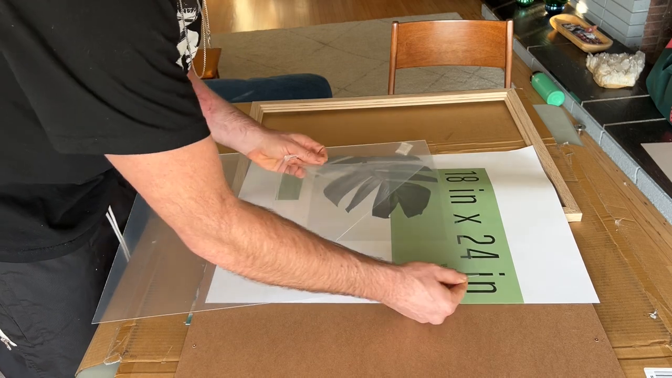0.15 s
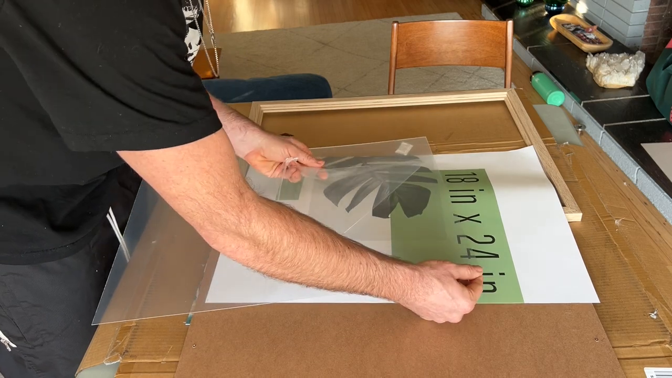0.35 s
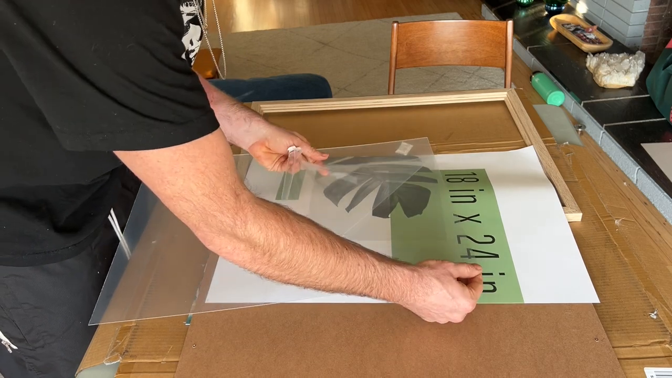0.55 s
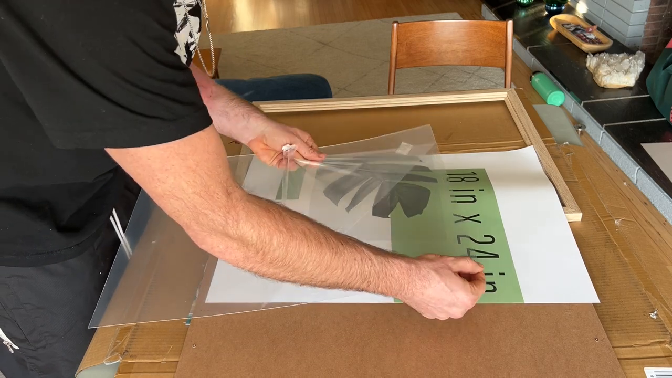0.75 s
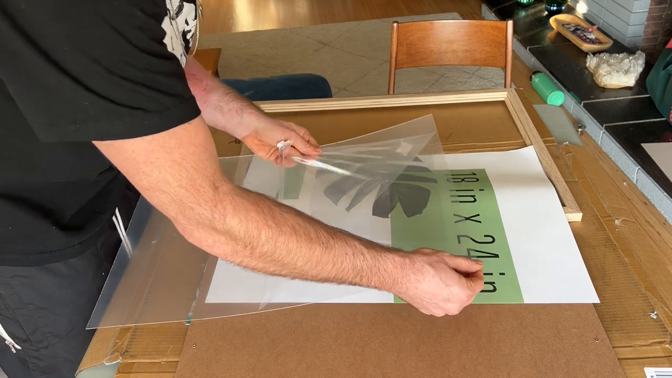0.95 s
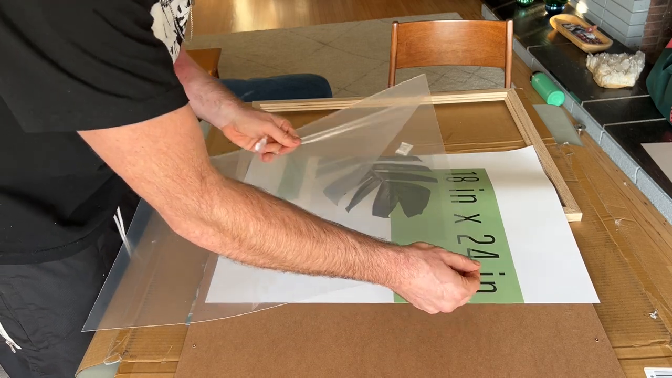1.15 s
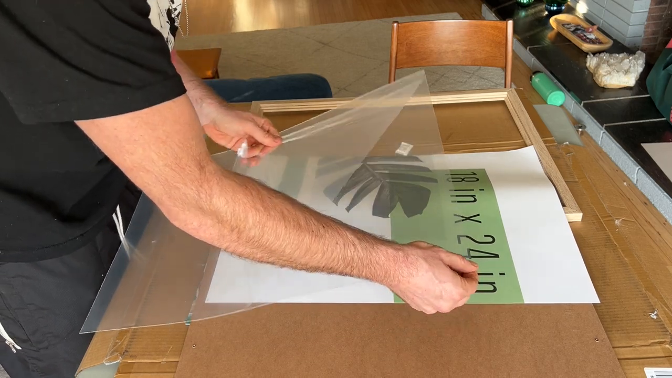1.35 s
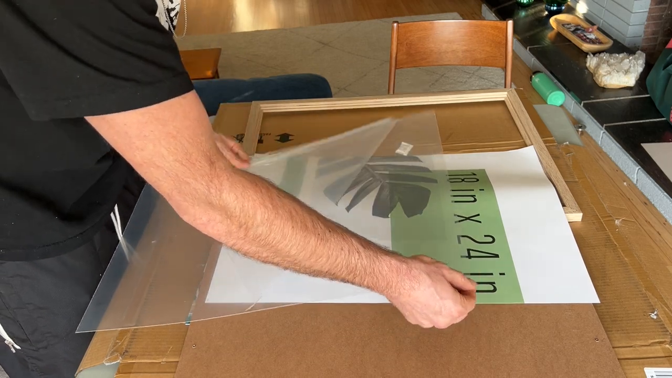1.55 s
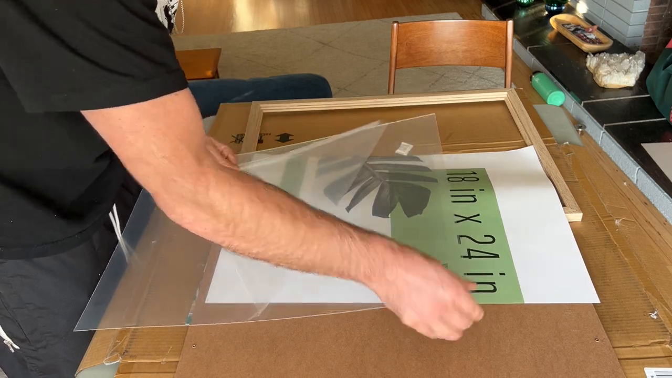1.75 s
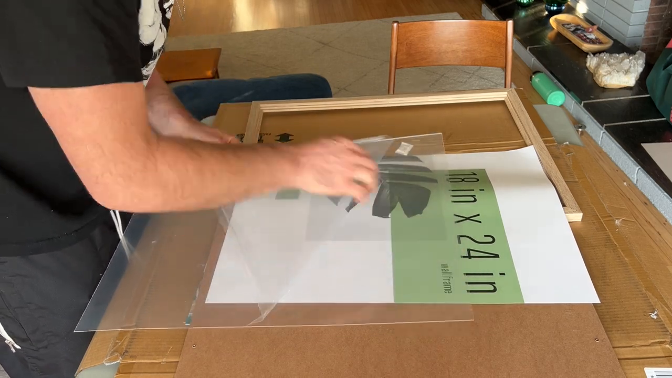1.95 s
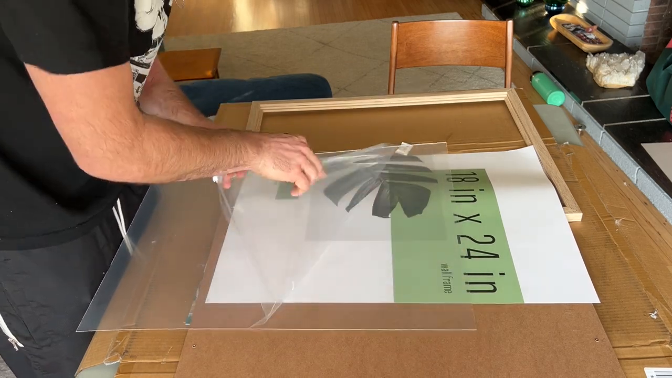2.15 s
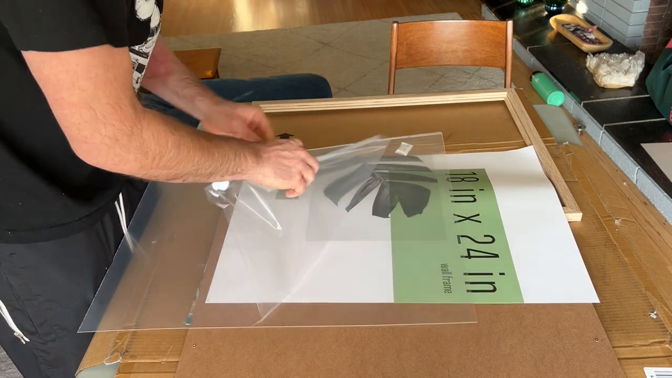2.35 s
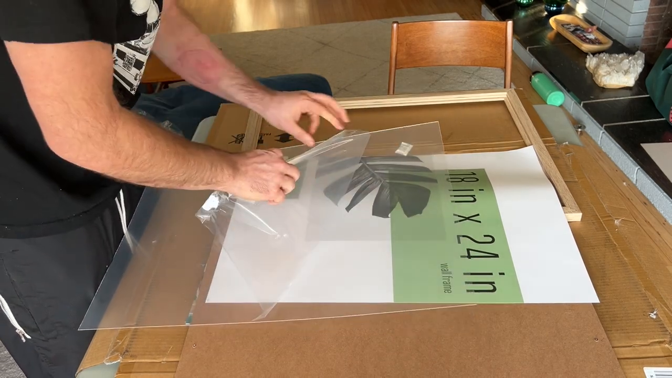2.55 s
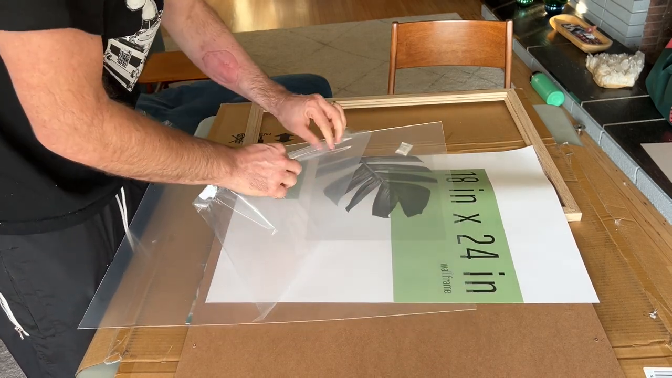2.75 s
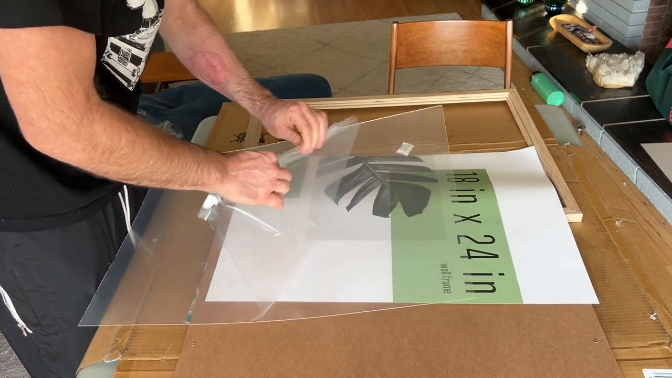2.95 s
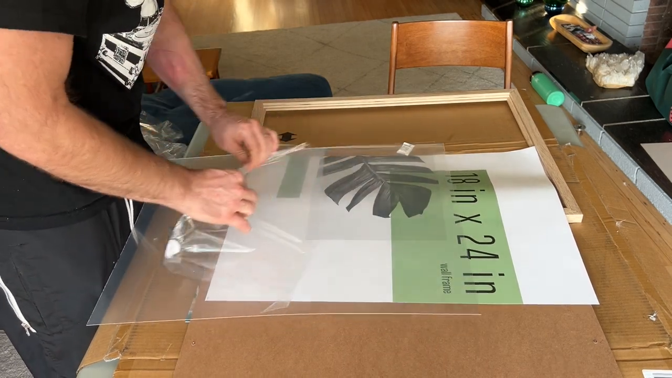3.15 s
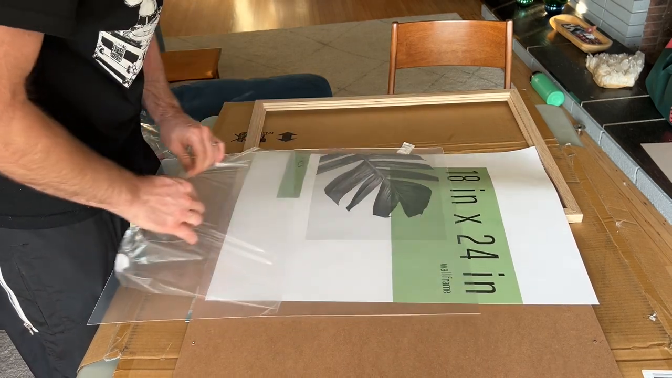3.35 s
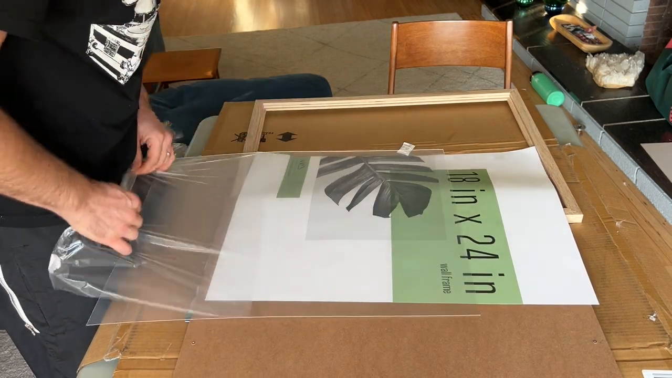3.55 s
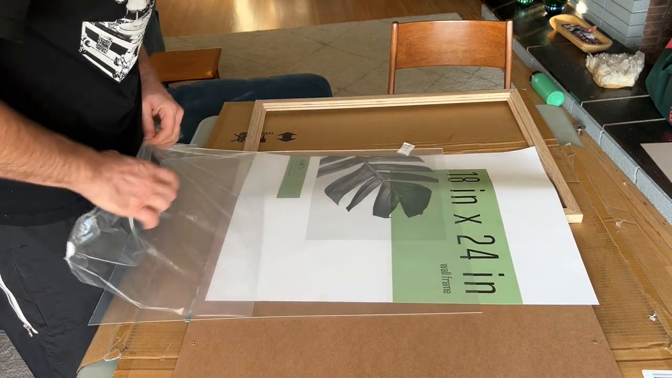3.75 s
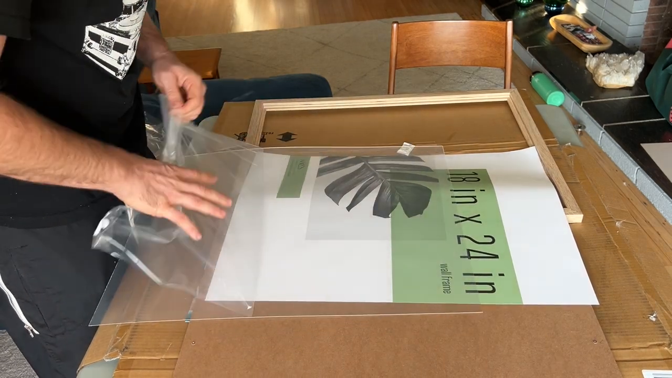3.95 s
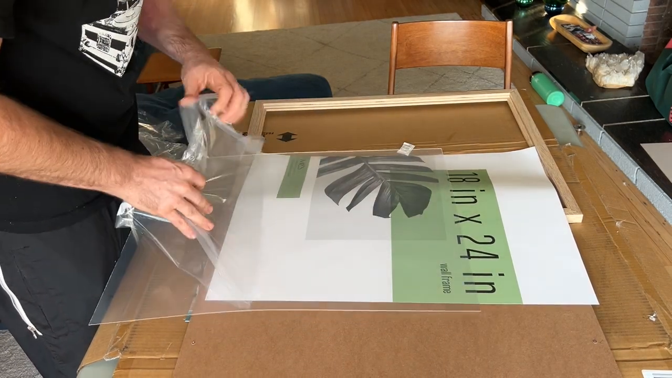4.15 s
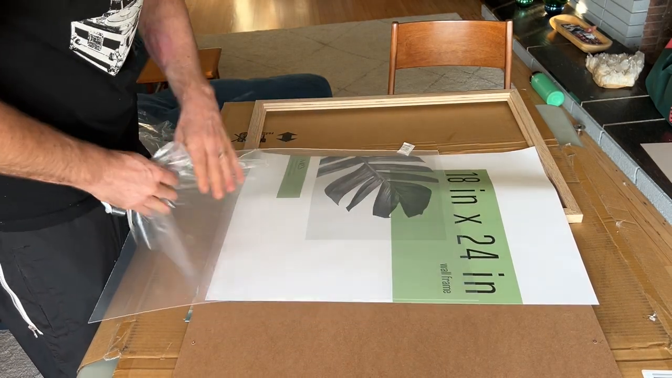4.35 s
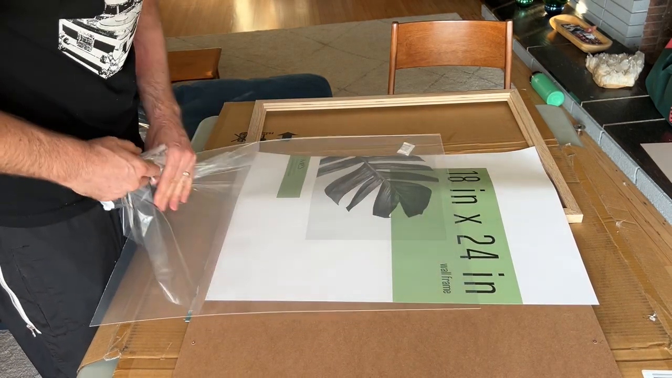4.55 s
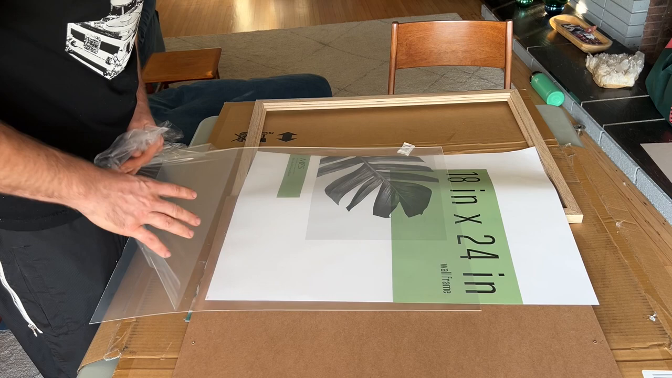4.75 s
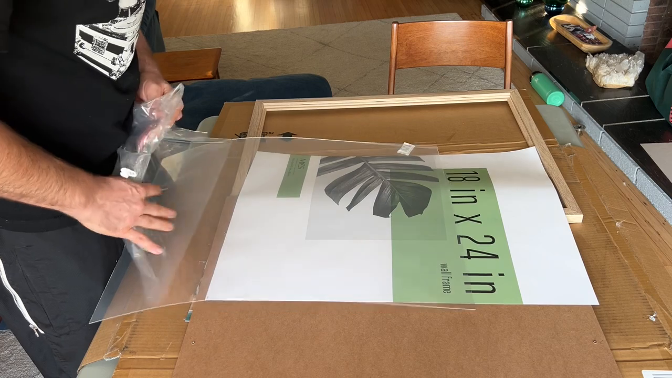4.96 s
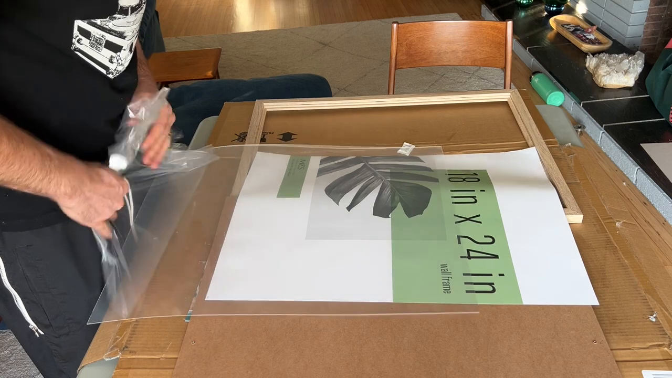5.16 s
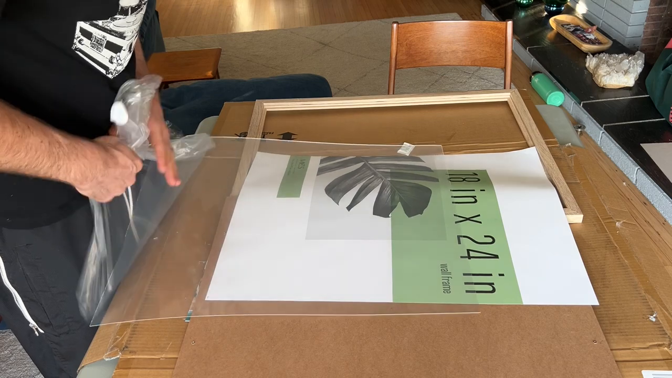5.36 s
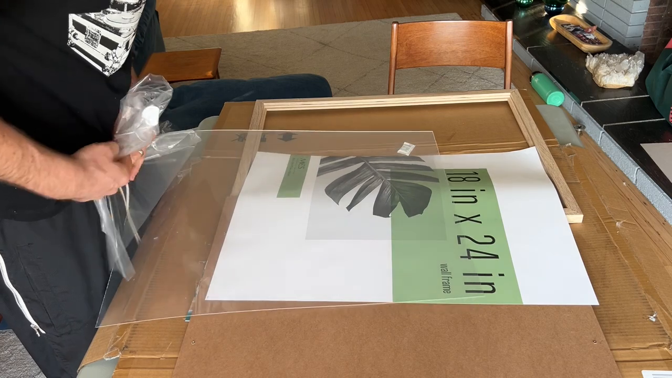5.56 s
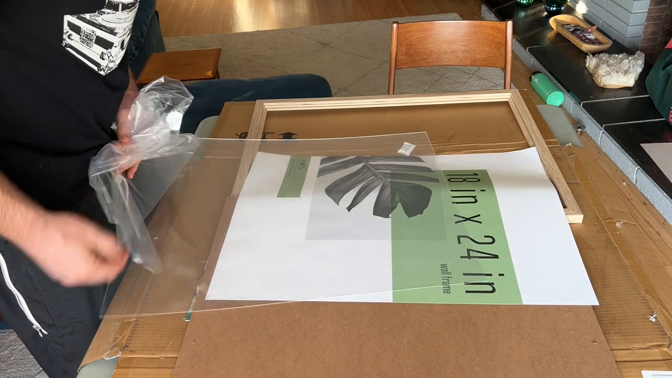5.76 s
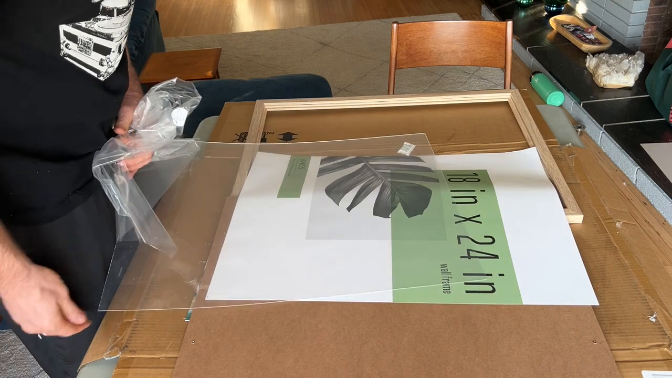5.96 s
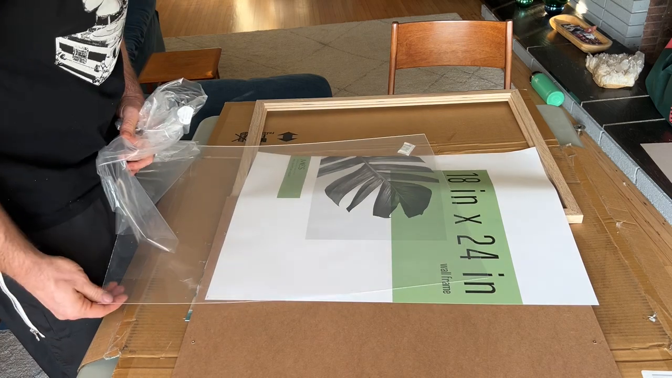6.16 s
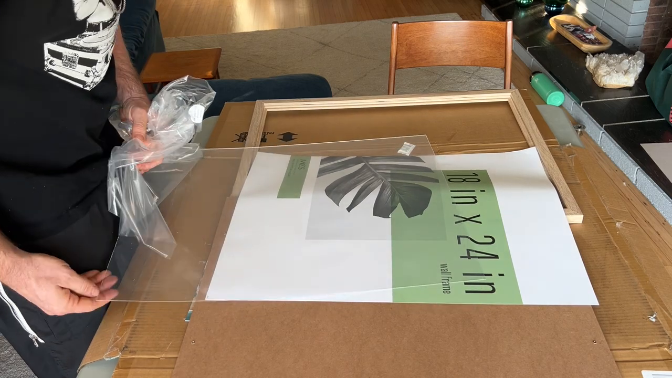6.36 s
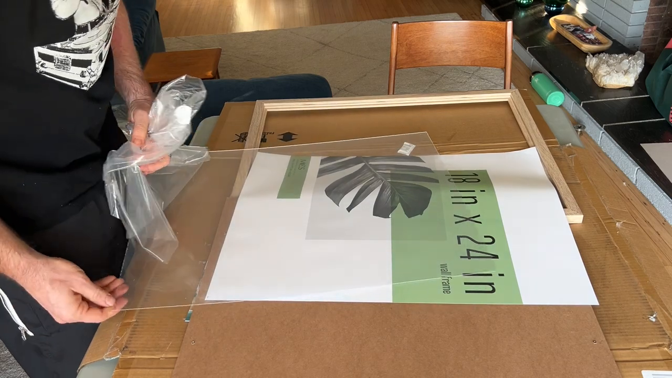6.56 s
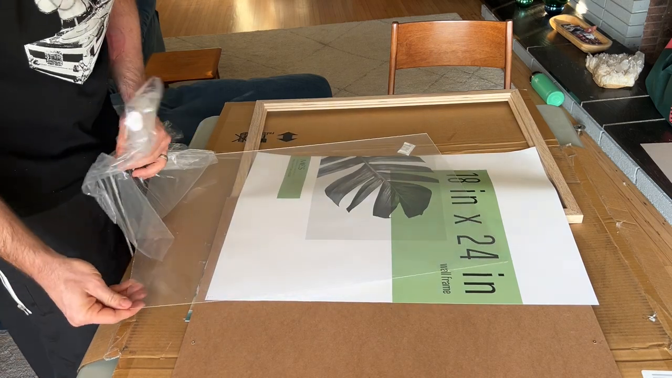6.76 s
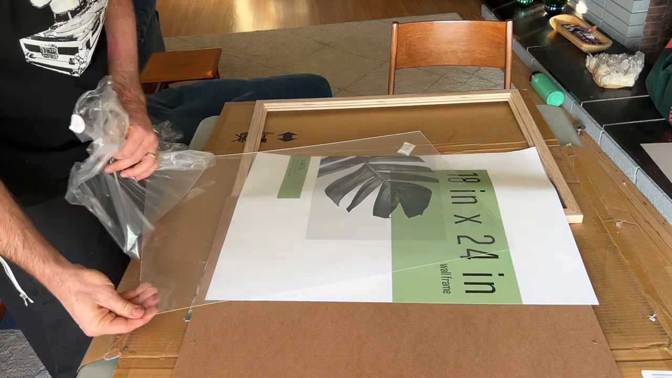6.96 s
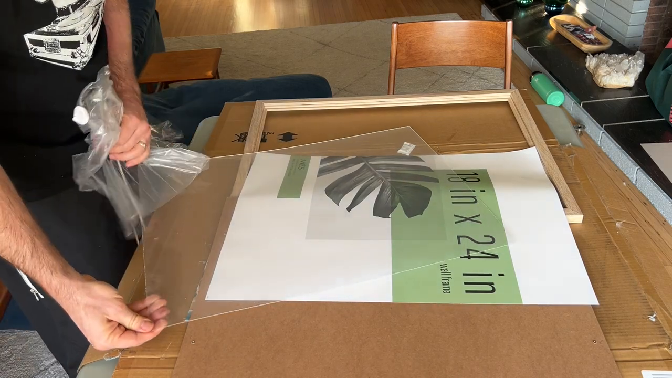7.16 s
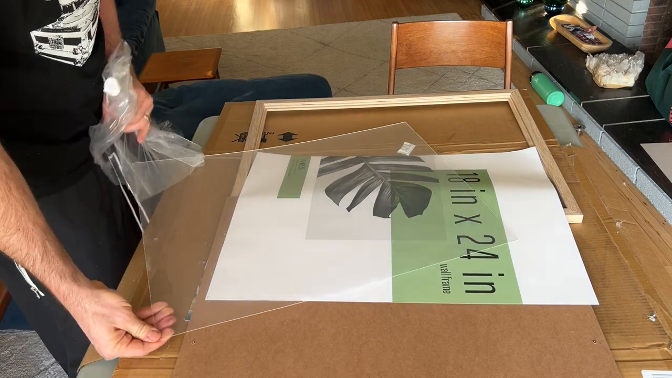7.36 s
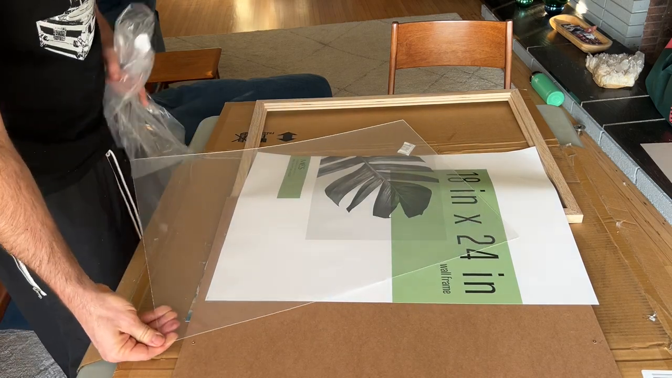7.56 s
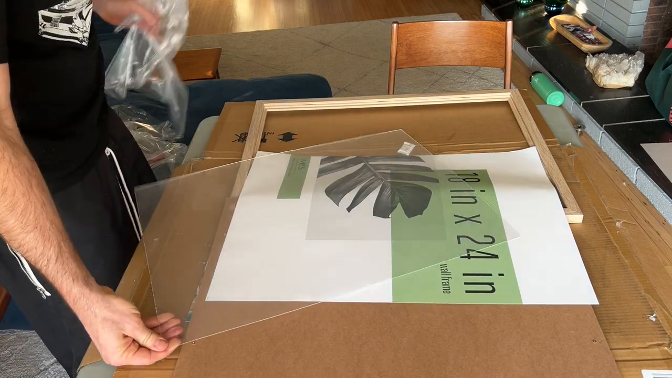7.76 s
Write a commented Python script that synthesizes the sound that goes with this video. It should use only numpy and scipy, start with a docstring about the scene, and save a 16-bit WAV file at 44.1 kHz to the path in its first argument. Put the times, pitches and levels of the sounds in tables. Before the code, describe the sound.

Hands strip clinging film from a plastic sheet: short bright rips, a longer steady hiss, crackly crumpling, low sheet wobbles, then a fainter peel.

```python
"""Peeling protective film off a plastic sheet

Hands peel a thin film off a clear plastic sheet on a work table, indoors. Each pull snaps a swarm of
tiny bonds, made of random clicks: the taut film hisses and the sheet drums under it. Creases crackle,
hand moves rustle the loose film and slide the sheet, and the sheet scrapes, wobbles and bumps the table.
Shaped noise and wavering tones make the room's background, and decaying noise makes its echoes."""
import sys
import numpy as np
from scipy import signal
from scipy.fft import rfft, irfft, next_fast_len
from scipy.io import wavfile
from scipy.ndimage import uniform_filter1d

SR = 44100
rng = np.random.default_rng(int(sys.argv[2]) if len(sys.argv) > 2 else 0)


def pcm_store(signal):
    """Save signal as 16-bit PCM."""
    levels = np.round(np.clip(np.atleast_2d(signal), -1, 1) * 32767)
    wavfile.write(sys.argv[1], SR, levels.astype(np.int16).T)


N = 343627
T = np.arange(N) / SR
RELEASE_S = .05  # extra time in which a stopped peel runs out

# Tone colour of the drumming sheet. Each row: frequency in Hz, strength in dB per Hz (relative).
SHEET_SPECTRUM = [(30, -28.5), (80, -10.5), (150, -0.5), (260, -3.5), (420, 3), (700, -4.5), (1300, -4),
                  (2500, -3.5), (8000, -18.5)]
# Tone colour of the loose film. Each row: frequency in Hz, strength in dB per Hz (relative).
LOOSE_SPECTRUM = [(300, -19.5), (1500, -2.5), (3000, -2), (6000, -3), (10000, -3), (16000, -7)]


def amp(db):
    """Turns decibels into gain."""
    return 10 ** (np.asarray(db) / 20)


def evened(x):
    """Scales a sound to an average strength (rms) of 1."""
    return x / np.sqrt(np.mean(x ** 2) + 1e-20)


def read(points, hz):
    """Reads a table between its rows, on a log-frequency axis."""
    f, value = np.transpose(points)
    return np.interp(np.log(hz + 1), np.log(f + 1), value)


def add(mix, s, sound):
    """Mixes a sound in, starting at s seconds."""
    part = mix[..., max(round(s * SR), 0):][..., :sound.shape[-1]]
    part += sound[..., :part.shape[-1]]


def coloured(x, spectrum):
    """Filters x by a spectrum and scales it to rms 1."""
    size = next_fast_len(x.shape[-1] + 512)
    gain = amp(read(spectrum, np.fft.rfftfreq(size, 1 / SR)))
    return evened(irfft(rfft(x, size) * gain, size)[..., :x.shape[-1]])


def snaps(count, per_s, spread_db):
    """Random clicks for mid and side; a positive spread makes a few large, a negative one a few small."""
    size = amp(spread_db * np.minimum(rng.exponential(1, (2, count)), 4.5))
    happens = rng.random((2, count)) < per_s / SR
    return evened(size * rng.standard_normal((2, count)) * happens)


def waver(count, rate_hz):
    """Wanders at random, in straight lines between rate_hz random points per second."""
    knots = rng.standard_normal(8192)
    return np.interp(np.arange(count) / SR * rate_hz, np.arange(len(knots)), knots)


def stroke(count, rise_s, fall_s):
    """Fades in over rise_s and out over fall_s."""
    t = np.arange(count) / SR
    return np.clip(t / rise_s, 0, 1) * np.clip((t[-1] - t) / fall_s, 0, 1)


def ambience(level_db=-51):
    """Background of the room: low, rumbling noise and faint tones whose phase wavers."""
    # Colour of the noise. Each row: frequency in Hz, strength in dB per Hz (relative).
    air_spectrum = [(20, -22), (50, 0), (80, 1.5), (120, -9), (250, -18.5), (480, -23), (900, -27.5),
                    (2500, -27), (8000, -30.5), (16000, -37.5)]
    # Humming tones. Each row: centre frequency in Hz, rms level in dB in the mid.
    hum_tones = [(79.7, -62.5), (157.7, -63.5), (487, -69.5)]
    air = amp(level_db) * coloured(rng.standard_normal((2, N)), air_spectrum)
    for hz, db in hum_tones:
        phase = 2 * np.pi * hz * T + 2.9 * waver(N, rate_hz=7.8)
        air[0] += amp(db) * np.sqrt(2) * np.sin(phase)
    return air


def handling(slide_db=-3.0, rustle_db=-4):
    """With each hand move the sheet scuffs over the table while the loose film crackles unevenly."""
    # Hand moves. Each row: peak time in seconds, rise in seconds, fall in seconds,
    # sliding sheet in dB and rustling film in dB at the peak (slide_db and rustle_db are added later).
    moves = [ (0.01, 0.078, 0.13, -41, -41.5), (0.21, 0.022, 0.13, -51.5, -50),
             (0.50, 0.036, 0.13, -50.5, -42), (0.72, 0.023, 0.053, -45.5, -52),
             (0.905, .01, 0.061, -50, -55.5), (1.12, 0.11, .05, -44.5, -38.5),
             (1.26, 0.093, 0.12, -35.5, -30), (1.78, 0.11, 0.095, -52, -61),
             (2.18, 0.057, 0.19, -44, -39.5), (2.31, 0.19, 0.24, -50.5, -38.5),
             (2.70, .08, 0.4, -64, -49.5), (3.74, 0.18, 0.11, -46, -43), (3.828, .012, 0.079, -43, -35),
             (4.04, 0.17, 0.14, -38, -29.5), (4.50, 0.3, 0.19, -36, -31.5), (4.90, 0.09, 0.21, -33, -27),
             (5.19, .12, 0.11, -34, -25), (5.40, 0.13, 0.073, -30.5, -28),
             (5.60, 0.092, 0.22, -32.5, -29.5), (5.78, .03, 0.2, -49, -43), (5.985, 0.013, 0.058, -41, -40),
             (6.10, 0.045, 0.19, -50.5, -52), (6.329, 0.028, 0.26, -52.5, -50.5),
             (6.60, .015, 0.18, -52.5, -49.5), (6.79, 0.13, 0.13, -58, -50),
             (7.73, 0.037, 0.054, -36, -33.5), ]
    # Colour of the sliding sheet. Each row: frequency in Hz, strength in dB per Hz (relative).
    slide_spectrum = [(30, -25.5), (100, -2), (250, -3), (430, 3), (750, -2.5), (1400, -4.5), (3000, -18),
                      (8000, -26.5)]
    drop_db = -14  # change in level one rise before and one fall after the peak
    slide, rustle = np.zeros((2, N))
    for s, rise, fall, sheet_db, film_db in moves:
        away = np.maximum((s - T) / rise, (T - s) / fall)
        near = away < 3
        motion_db = drop_db * away[near]
        # overlapping moves add as power
        slide[near] = np.hypot(slide[near], amp(sheet_db + motion_db))
        rustle[near] = np.hypot(rustle[near], amp(film_db + motion_db))
    scuff = coloured(snaps(N, per_s=2500, spread_db=1.0), slide_spectrum)
    scuff = scuff * amp(slide_db + 0.53 * waver(N, rate_hz=47))
    crackle = coloured(snaps(N, per_s=6000, spread_db=2.6), LOOSE_SPECTRUM)
    crackle = crackle * amp(rustle_db + 2 * waver(N, rate_hz=110))
    return slide * scuff + rustle * crackle


def crinkle(s, level_db, tilt_db, travel_s=.0022, ring_s=0.00082):
    """A crease flips; bending waves carry its treble through the film faster than its bass."""
    t, hz = np.arange(1024) / SR, np.fft.rfftfreq(1024, 1 / SR)
    flip = rng.standard_normal(len(t)) * (np.exp(-t / ring_s) + .04 * np.exp(-t / .004))
    colour = amp(read(LOOSE_SPECTRUM, hz) + tilt_db * np.clip((hz - 2000) / 8000, 0, 1))
    lag = np.exp(-4j * np.pi * travel_s * np.sqrt(1000 * hz))  # delays 1000 Hz by travel_s
    snap = irfft(rfft(flip) * colour * lag)
    # the level is set as if all the energy fell within 4 ms
    return s - .0007, amp(level_db) * snap / np.linalg.norm(snap) * np.sqrt(0.004 * SR)


def bell(octaves, width):
    """A smooth hump on a log-frequency axis."""
    return np.exp(-.5 * (octaves / width) ** 2)


def patches(shape):
    """Random patches of rms 1, some 500 Hz by 50 ms."""
    field = rng.standard_normal(shape)
    along_hz = uniform_filter1d(field, size=3, axis=0)
    return evened(uniform_filter1d(along_hz, size=18, axis=1))


def film_gain(hz, ring_hz, bright_db, ring_db=7.0, ring_octaves=0.35, overtone_db=2, overtone=2.03,
              skirt_db=8, skirt_octaves=1.46):
    """The taut film rings with one broad mode and its overtone, and radiates poorly below them."""
    # Basic colour of the film. Each row: frequency in Hz, strength in dB per Hz (relative).
    film_spectrum = [(200, -23), (1000, -16.5), (2000, -8), (3500, -0.5), (6000, -3.5), (8000, -2.5),
                     (10000, 0), (12500, -3), (16000, -5.5)]
    octaves = np.log2((hz + 1) / ring_hz)
    modes = ring_db * bell(octaves, ring_octaves)
    modes = modes + overtone_db * bell(octaves - np.log2(overtone), 0.21)
    skirt = skirt_db * np.clip(-(octaves + 0.29) / (skirt_octaves - .35), 0, 1)
    treble = np.clip((hz - 5500) / 6000, 0, 1) * (bright_db + 6)
    shifting = 1.7 * patches(octaves.shape)  # wrinkles come and go in the span
    gain = amp(read(film_spectrum, hz) + modes - skirt + treble + shifting)
    return gain / np.linalg.norm(gain, axis=0)


def peel(t, stop_s, level_db, ring_hz, sheet_db, bright_db, catch_db=0.65, drum_db=-2):
    """Bonds snap along the peel line and shake both the film and the sheet, until the hand stops."""
    grab_db, grab_s = -6.5, 0.0074  # the hiss starts this much weaker and takes hold this fast
    release_db = -17  # drop over RELEASE_S once the hand stops, before the final fade
    bonds = snaps(len(t), per_s=15000, spread_db=0.6)
    hz, at, z = signal.stft(bonds, SR, nperseg=256)
    z *= film_gain(hz[:, None], np.interp(at, t, ring_hz), np.interp(at, t, bright_db))
    hiss = evened(signal.istft(z, SR, nperseg=256)[1][:, :len(t)])
    hiss = hiss * amp(level_db + grab_db * np.exp(-t / grab_s))
    drum = coloured(bonds, SHEET_SPECTRUM) * amp(sheet_db + drum_db)
    # the peel line catches and runs on, so the level flutters
    flutter_db = catch_db * waver(len(t), rate_hz=180)
    force = amp(release_db * np.maximum(t - stop_s, 0) / RELEASE_S + flutter_db)
    return (hiss + drum) * force * stroke(len(t), rise_s=0.0019, fall_s=0.0076)


def pull(s, length, level_db, swell_db, start_hz, end_hz, sheet_db, bright_db):
    """One short pull: force and tautness change evenly, the hiss dulls and the jolted sheet calms."""
    drum_sag_db_per_s = -42.5
    dulling_db = -5.5  # change in brightness over the pull
    t = np.arange(0, length + RELEASE_S, 1 / SR)
    done = np.minimum(t / length, 1)
    force_db = level_db + swell_db * (done - .5)
    ring_hz = start_hz + (end_hz - start_hz) * done
    drumming_db = sheet_db + drum_sag_db_per_s * t
    brightness_db = bright_db + dulling_db * (done - .5)
    return s, peel(t, length, force_db, ring_hz, drumming_db, brightness_db)


def scrape(s, length, level_db, start_hz, end_hz):
    """The sheet's edge scrapes the table: small slips excite a broad resonance that glides in pitch."""
    slips = snaps(round(length * SR), per_s=2400, spread_db=-1)
    glide_hz = np.linspace(start_hz, end_hz, slips.shape[1])
    turn = np.exp(2j * np.pi * np.cumsum(glide_hz) / SR)
    r = np.exp(-np.pi * .85 * start_hz / SR)  # heavily damped by the table
    # shift the gliding pitch down to zero, smooth there, and shift back
    rasp = (turn * signal.lfilter([1], np.poly([r, r]), slips / turn)).real
    return s, amp(level_db) * evened(rasp) * stroke(slips.shape[1], rise_s=0.0053, fall_s=0.024)


def flex():
    """Each bend of the lifted sheet pushes air in a low wobble that dies away."""
    # Bends of the sheet. Each row: start in seconds, level in dB before the rise and decay.
    wobbles = [(1.56, -45), (2.43, -45), (3.21, -41), (4.45, -53), (4.69, -40), (4.95, -49), (5.12, -35),
               (5.47, -49), (5.72, -41), (6.02, -48), (6.93, -48)]
    rise_s, t60_s = .03, 0.92  # t60: time to fall by 60 dB
    level, t = np.zeros(N), np.arange(SR) / SR
    for s, level_db in wobbles:
        add(level, s, np.minimum(t / rise_s, 1) * amp(level_db - 60 * t / t60_s))
    low = [(15, -30.5), (35, -6.5), (80, 0.5), (140, -13), (300, -19), (1000, -76.5)]  # Hz, dB
    return level * coloured(rng.standard_normal((2, N)), low)


def bump(s, level_db, hz, t60):
    """The sheet bumps the table: a soft knock with two damped modes."""
    t = np.arange(SR // 3) / SR
    ring = np.sin(2 * np.pi * hz * t) + .5 * np.sin(2 * np.pi * hz * 0.684 * t)
    return s, ring * amp(level_db - 60 * t / t60) * (1 - np.exp(-t / 0.0037))


def tug(s, length, level_db, sheet_db):
    """A short strip lets go all at once: a brief burst of snaps in film and sheet."""
    bonds = snaps(round((length + 0.0024) * SR), per_s=14000, spread_db=2.0)
    rip_spectrum = [(300, -44), (1000, -14.5), (2000, -5.5), (5000, 6.0), (8000, 4.0),
                    (11000, 4.0), (16000, -1.5)]  # Hz, dB
    rip = coloured(bonds, rip_spectrum)
    drum = amp(sheet_db) * coloured(bonds, SHEET_SPECTRUM)
    return s, amp(level_db) * (rip + drum) * stroke(bonds.shape[1], rise_s=0.0023, fall_s=0.004)


def long_peel(rows, hiss_db=1.12, drum_db=3.0):
    """A long, steady draw: the pitch of the hiss follows the changing tautness of the film."""
    s, *controls = np.transpose(rows)
    length = s[-1] - s[0]
    t = np.arange(0, length + RELEASE_S, 1 / SR)
    level_db, ring_hz, sheet_db, bright_db = (np.interp(s[0] + t, s, control) for control in controls)
    return s[0], peel(t, length, level_db + hiss_db, ring_hz, sheet_db + drum_db, bright_db)


def room(x, gap_s=0.0024, cycles_per_s=2.5, count=4):
    """Dense reflections, made of decaying noise; the sound fades steadily from one pattern to the next."""
    # How long echoes last. Each row: frequency in Hz, time to fall by 60 dB in seconds.
    decay_times = [(150, 0.51), (500, 0.47), (2000, 0.37), (5000, 0.42), (10000, 0.35), (16000, 0.23)]
    wet = np.zeros((2, N))
    for k in range(count):
        hz, t, z = signal.stft(rng.standard_normal((2, SR * 3 // 4)), SR, nperseg=256)
        fading = z * amp(-60 * t / read(decay_times, hz)[:, None])
        tail = signal.istft(fading, SR, nperseg=256)[1]
        # silent for half a gap, full after one and a half
        tail *= np.clip(np.arange(tail.shape[1]) / SR / gap_s - .5, 0, 1)
        away = abs((T * cycles_per_s * count + k) % count - count / 2)
        share = np.sqrt(np.clip(1 - away, 0, 1))
        wet += signal.oaconvolve((x * share)[None], tail / np.linalg.norm(tail[0]), axes=1)[:, :N]
    return wet


def scene(peel_room_db=-6, loose_room_db=-3, knock_room_db=-8):
    """All sources as mid and side, with their echoes, turned into left and right."""
    # Snapping creases. Each row: time in seconds, level in dB, treble tilt in dB
    # (tight creases are brighter than slack folds).
    crinkles = [(0.2045, -42, 2), (0.297, -44, 12), (0.488, -27.5, 13.5), (0.5604, -34.5, 6),
                (0.6151, -25, 10), (0.6888, -32.5, 4), (0.847, -52, 15), (0.8985, -36, 5),
                (0.9674, -37.5, 7), (1.0109, -33.5, -12), (1.0434, -28.5, 12.5), (1.0546, -38, -5),
                (1.0692, -33.5, -8.5), (1.1035, -22, -1.5), (1.1258, -18, -1.5), (1.378, -16, 4),
                (1.9308, -42.5, -3), (1.97, -45.5, 0), (2.0617, -44.5, -5), (2.134, -38.5, 6),
                (2.3417, -32, -10), (2.766, -41.5, -2), (3.7795, -34, 9), (3.908, -34.5, -3),
                (5.7146, -28, 30), (5.777, -31, 28), (5.838, -38, 9), (6.3088, -42, 3), (6.359, -45, 6),
                (6.428, -36, 3.5), (6.491, -45.5, 4), (6.6245, -42, 3), (6.8247, -38.5, -4)]
    # Short pulls. Each row: start in seconds, length in seconds, hiss level in dB, swell over the pull
    # in dB, film resonance at the start in Hz and at the end in Hz, drumming of the sheet in dB
    # (before peel's trim), brightness in dB (before film_gain's 6 dB lift).
    pulls = [ (1.127, 0.11, -17.5, 2, 5430, 6400, -26.5, -2),
             (1.385, 0.12, -13.5, 5, 6300, 5960, -26, -3.5), (1.532, 0.075, -15, -3, 5760, 4930, -34.5, -6),
             (2.896, 0.025, -22, 4, 4900, 5200, -29.5, -5),
             (4.205, 0.067, -15.5, -0.5, 5000, 5300, -35.5, -3.5),
             (4.317, 0.068, -11, -1, 6230, 5750, -31, -1), (4.509, 0.066, -25.5, 6.5, 4000, 4770, -28.5, 0),
             (4.571, 0.17, -12.5, 1.5, 4900, 5680, -31, -2), (4.930, 0.052, -13.5, 0, 5600, 5050, -24, -.5),
             (5.014, 0.057, -8.5, -6.5, 5470, 6570, -22.5, 4.5),
             (5.155, 0.065, -17.5, -1.5, 6700, 6100, -27.5, -3),
             (5.303, 0.077, -16, -3, 6800, 6130, -24, -1.5),
             (5.439, 0.11, -20, -4.5, 4200, 5370, -22.5, -3),
             (6.882, 0.021, -25.5, 2.5, 4350, 4300, -38.5, -4), ]
    # Edge scrapes. Each row: start in seconds, length in seconds, level in dB,
    # resonance at the start in Hz and at the end in Hz.
    scrapes = [(1.551, 0.081, -35, 2100, 1590), (2.177, 0.031, -40, 2270, 1700),
               (2.274, 0.029, -35, 2300, 1700), (3.994, 0.054, -49, 1500, 1200),
               (5.97, 0.038, -48.5, 1200, 850), (6.066, 0.05, -45.5, 900, 697),
               (6.706, 0.04, -51.5, 900, 700), (6.771, 0.031, -54, 1310, 1100),
               (7.714, 0.034, -35, 1130, 600)]
    # Table bumps. Each row: start in seconds, level in dB, pitch in Hz, time to fall by 60 dB in seconds.
    bumps = [(2.18, -20.5, 420, 0.029), (2.86, -27.5, 387, 0.075), (3.173, -30, 420, 0.054),
             (4.718, -41.5, 63.4, 0.15), (6.628, -32.5, 46.4, 0.21)]
    # Short tugs. Each row: start in seconds, length in seconds (a little is added), level in dB,
    # drumming of the sheet in dB relative to the tug.
    tugs = [(2.380, 0.022, -16, -26), (2.413, 0.019, -15.5, -20), (2.446, 0.027, -18.5, -17),
            (2.477, 0.03, -19, -18.5), (2.527, 0.017, -17.5, -16), (2.814, 0.029, -17, -23.5),
            (2.855, 0.016, -17.5, -16.5), (4.873, 0.017, -27.5, -23), (4.89, 0.013, -30.5, -5),
            (5.127, 0.014, -14.5, -12), (5.264, 0.019, -21, -5), (6.854, 0.027, -34, -12)]
    # Two long peels, one list of rows each. Each row: time in seconds, hiss level in dB, film resonance
    # in Hz, drumming in dB, brightness in dB (long_peel, peel and film_gain add their trims).
    long_peels = [
        [(2.93, -17, 5190, -38, -3), (2.944, -16.5, 5430, -43.5, -5.5), (3.122, -14, 6500, -47, -5.5),
         (3.204, -14.5, 6100, -39.5, -6), (3.248, -14.5, 5630, -42, -6), (3.504, -13, 6300, -41.5, -4.5),
         (3.55, -16.5, 5430, -37.5, -7.5)],
        [(6.93, -24, 4780, -35, -4), (6.944, -22.5, 4760, -38.5, -5.5), (7.032, -24.5, 5540, -40.5, -3.5),
         (7.316, -25, 4860, -43.5, -5), (7.412, -23, 6330, -42.5, -2), (7.6, -22, 7350, -45.5, -3),
         (7.66, -22, 8400, -51, -1)],
    ]
    taut, knocks = np.zeros((2, 2, N))
    loose = handling()
    for row in crinkles:
        add(loose[0], *crinkle(*row))
    for row in pulls:
        add(taut, *pull(*row))
    for row in scrapes:
        add(loose, *scrape(*row))
    for row in bumps:
        add(knocks[0], *bump(*row))
    for row in tugs:
        add(taut, *tug(*row))
    for rows in long_peels:
        add(taut, *long_peel(rows))
    to_room = amp(peel_room_db) * taut[0] + amp(loose_room_db) * loose[0] + amp(knock_room_db) * knocks[0]
    mid, side = taut + loose + knocks + room(to_room) + flex() + ambience()
    return np.array([mid + side, mid - side]) / 2


def record(dry):
    """The microphone pair sets width, phase and balance at each frequency; then the top is cut off."""
    # The microphone pair. Each row: frequency in Hz, left-right likeness (0 to 1),
    # lead of the left in radians, left minus right in dB.
    ports = np.transpose([(100, 0.96, 0.02, 0.15), (500, 0.83, 0.2, 0.95), (1100, 0.25, 0.52, 1.12),
                          (2400, 0.85, 0.01, 0.08), (3100, 0.7, -0.2, -0.53), (3800, 0.52, -0.49, -0.95),
                          (5000, 0.51, -0.63, -2.64), (5800, 0.29, 0.64, -2.7), (7000, 0.84, -0.05, -0.31),
                          (8100, 0.65, 0.77, -0.84), (8900, 0.91, 2.96, 0.0), (10000, 0.85, 3.46, -0.3),
                          (11400, 0.96, 6.24, 0.01), (12600, 0.96, 6.32, -0.12), (13600, 0.88, 9.25, 0.14),
                          (14900, 0.94, 9.51, -0.05), (15700, 0.57, 11.12, -0.22)])
    edge_hz = 15980
    size = next_fast_len(N + 4096)
    hz = np.fft.rfftfreq(size, 1 / SR)
    same, lead, balance_db = (np.interp(hz, ports[0], column) for column in ports[1:])
    same = np.clip(same, 0, 1)
    mid = rfft(dry[0] + dry[1], size) * np.sqrt((1 + same) / 2)
    side = rfft(dry[0] - dry[1], size) * np.sqrt((1 - same) / 2)
    turn = np.exp(.5j * lead) * amp(balance_db / 2)
    pair = irfft([(mid + side) * turn, (mid - side) / turn], size)[:, :N]
    pair = np.tanh(pair / 1.3) * 1.3  # the highest peaks are rounded off
    low_pass = signal.firwin(511, edge_hz, window=("kaiser", 9), fs=SR)
    return signal.oaconvolve(pair, low_pass[None], "same")


dry = scene()
out = record(dry)
pcm_store(out)
```